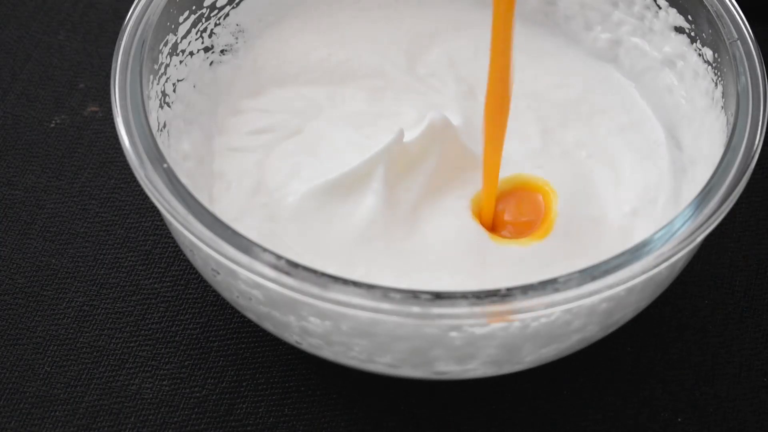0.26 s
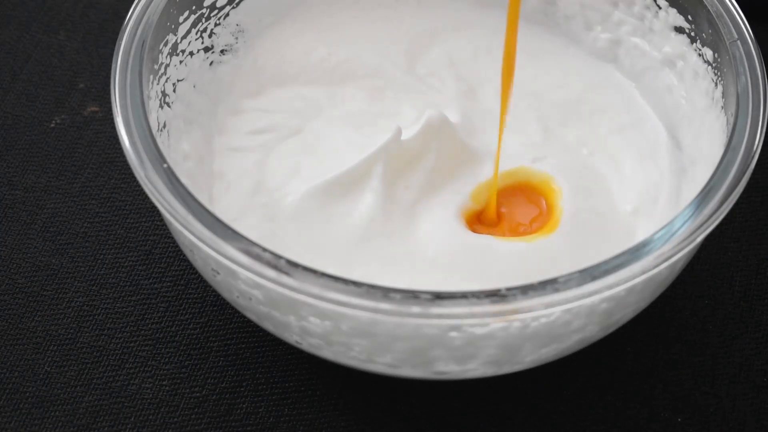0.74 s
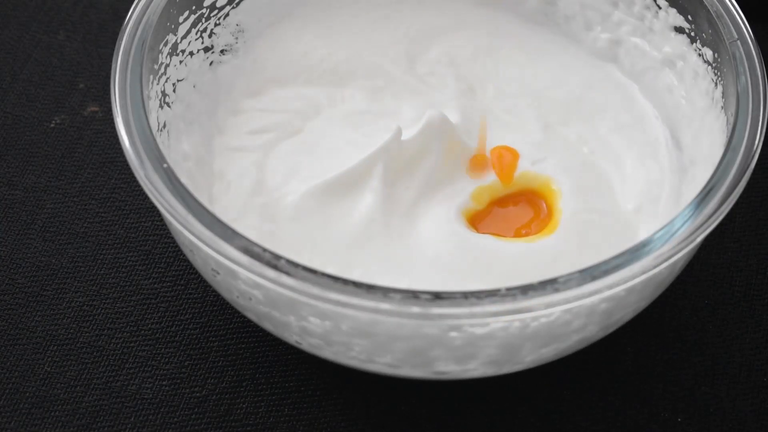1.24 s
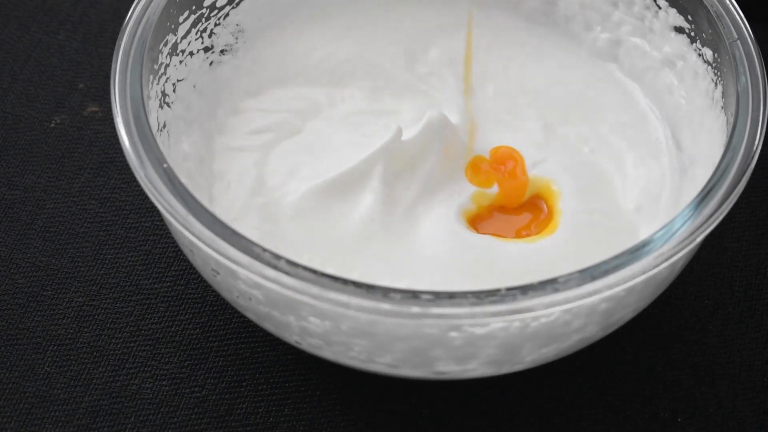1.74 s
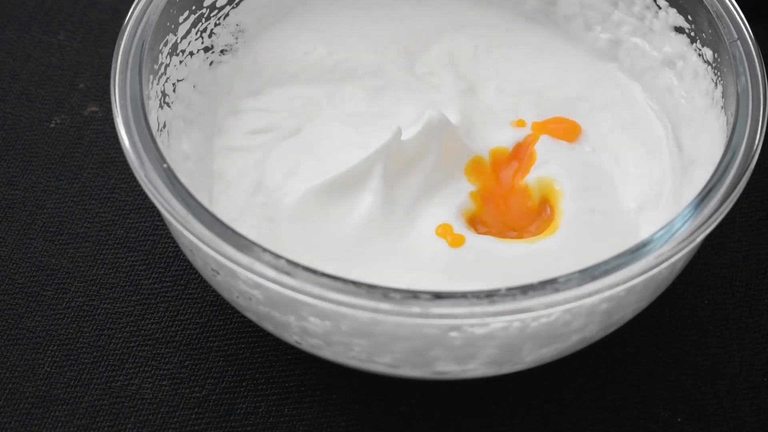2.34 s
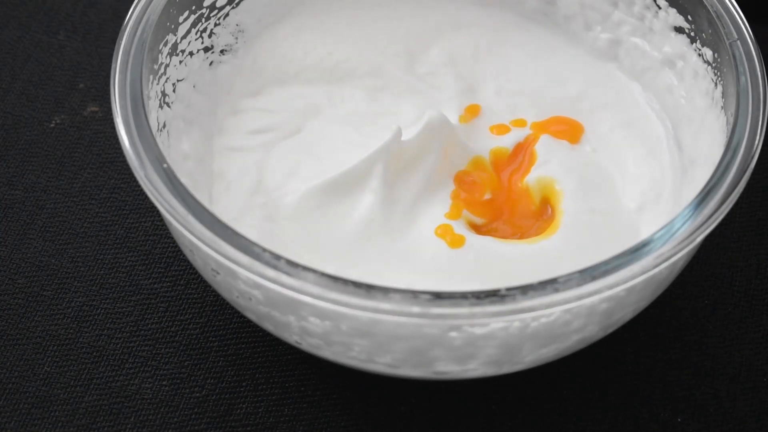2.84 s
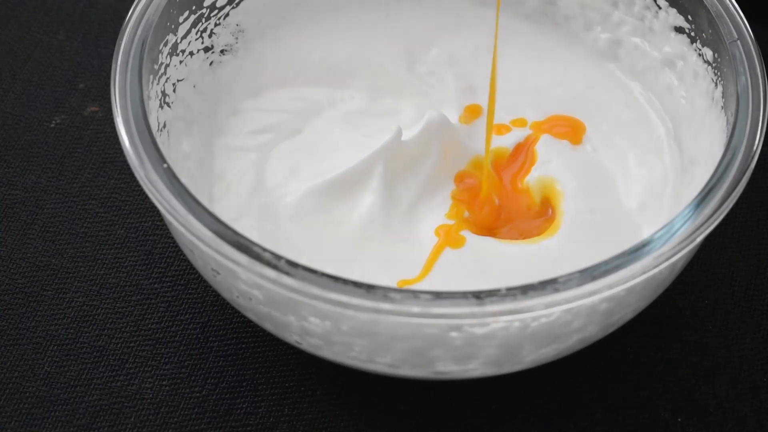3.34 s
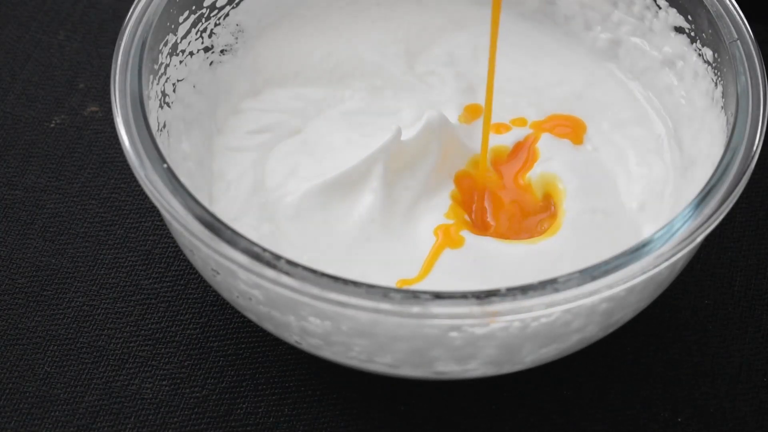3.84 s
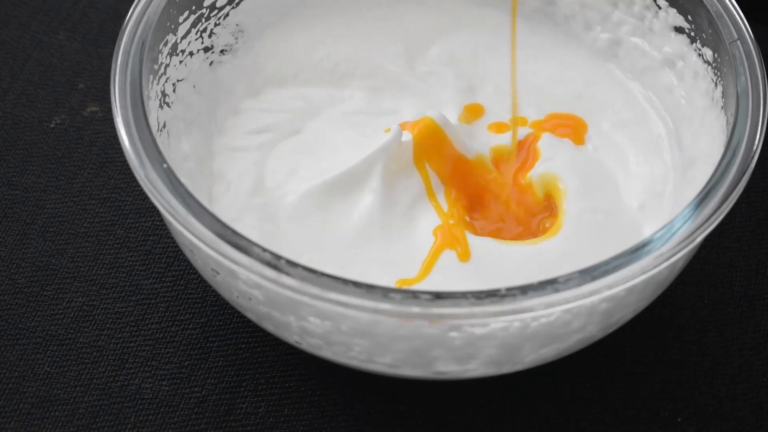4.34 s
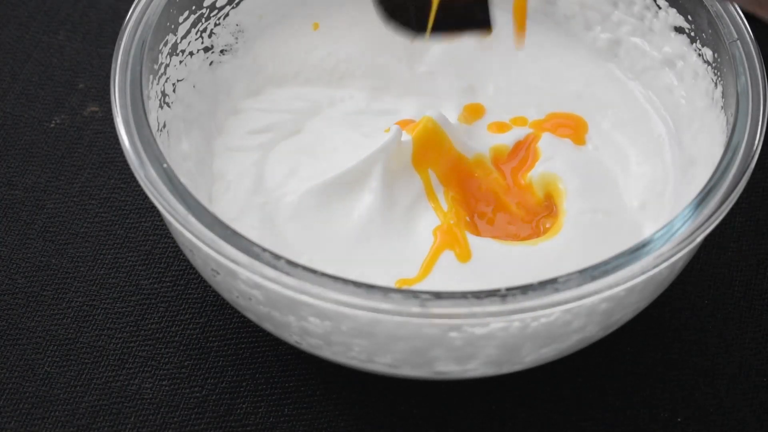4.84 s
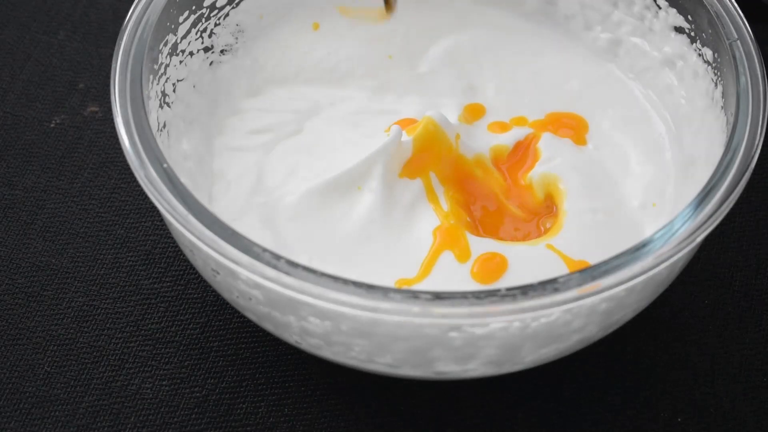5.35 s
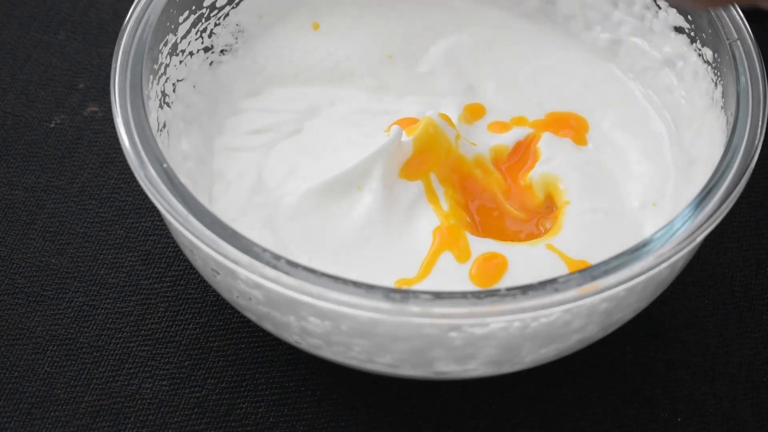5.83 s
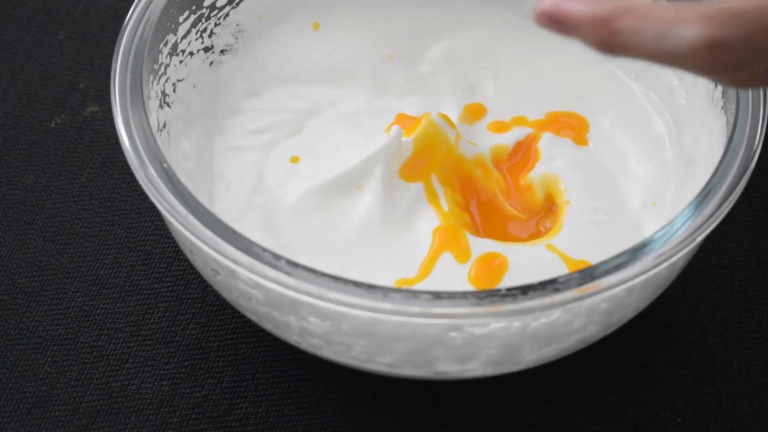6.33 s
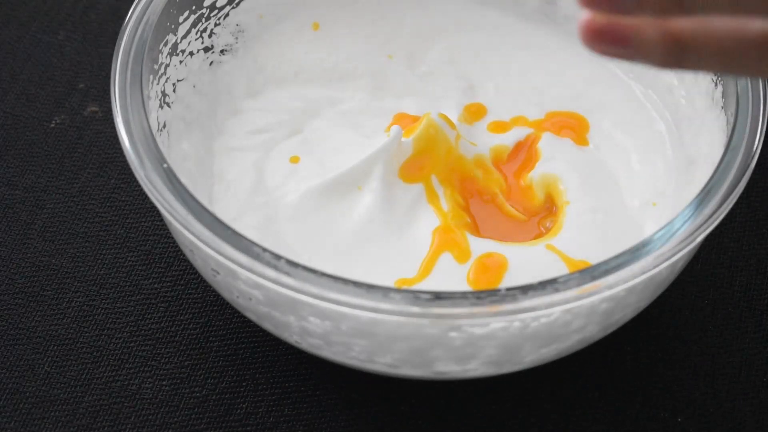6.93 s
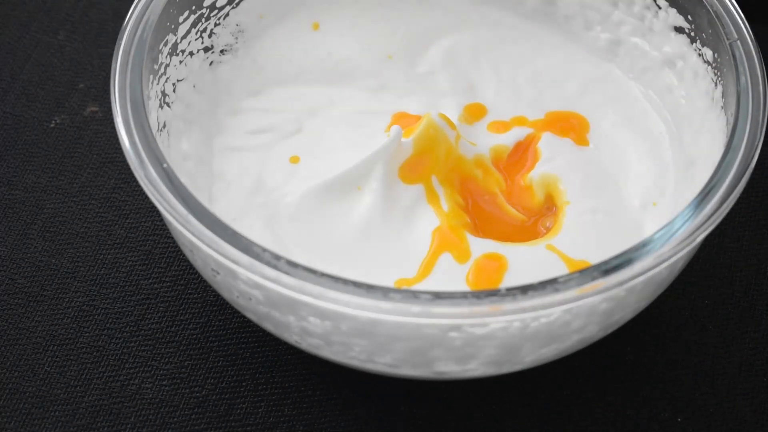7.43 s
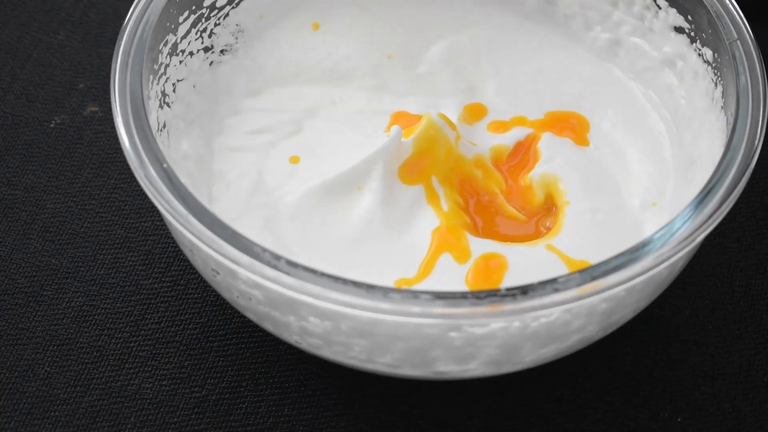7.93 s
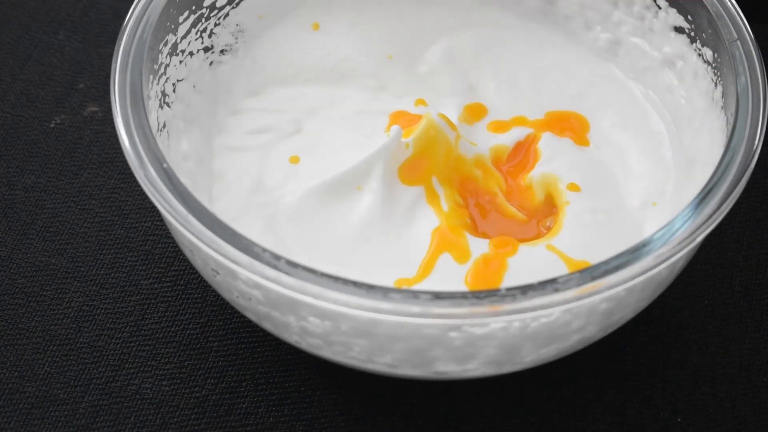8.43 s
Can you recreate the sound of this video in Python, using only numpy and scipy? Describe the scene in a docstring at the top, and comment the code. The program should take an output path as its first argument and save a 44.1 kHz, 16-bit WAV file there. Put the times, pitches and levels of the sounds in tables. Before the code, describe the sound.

A spatula scrapes egg yolk from a small glass dish, heard close up. For the first three seconds there are soft, scattered knocks of the blade and faint wet wiping strokes, while the yolk lands in barely audible low plops. The stem clacks on the rim at about 2.8 and 3.1 seconds, and the handle clicks lightly at 3.7. The dish clinks at 4.2 and 4.5 seconds, then gives one loud, bright, briefly ringing clink at 4.8. A few soft knocks and more quiet wiping follow until about 6 seconds. At 6.3 the spatula is laid on the table with a loud, short knock. Light taps on the glass come between 6.5 and 7.2 seconds, then only the background remains until the end, near 8.5. The small, hard kitchen adds a short echo to each blow, over faint steady hiss, rumble and electrical hum.

```python
"""A spatula scrapes egg yolk from a small glass dish onto whipped egg white, close up.
First the blade wipes and knocks and its stem clacks on the rim; the yolk lands almost silently.
The handle clicks at 3.7 s, then the dish clinks, hardest at 4.8 s. After more wiping the spatula
is laid on the table at 6.3 s; light taps on the glass follow.
Throughout, a small hard kitchen answers each blow over faint hiss, rumble and mains hum."""
import sys
import numpy as np
from scipy import signal
from scipy.fft import rfft, irfft
from scipy.io import wavfile

SR = 44100
rng = np.random.default_rng(int(sys.argv[2]) if len(sys.argv) > 2 else 0)


def master_out(mix):
    """Clip the mix to full scale and print it as 16-bit PCM to the path in sys.argv[1]."""
    frames = np.transpose(np.atleast_2d(mix))
    ceiling = np.clip(frames, -1, 1)
    pcm = np.round(ceiling * 32767).astype(np.int16)
    wavfile.write(sys.argv[1], SR, pcm)


N = 382788
RING_TIME_S = np.arange(SR // 3) / SR

# background spectrum: f/Hz, relative density/dB
FLOOR_SPECTRUM = [(12, -27.5), (20, 5), (30, -3.5), (42, -11.5), (59, -6.5), (85, -14), (120, -13.5),
                  (150, -17.5), (240, -20), (290, -21.5), (700, -27), (1470, -31.5), (2720, -34.5),
                  (15800, -38)]
# background stereo image: f/Hz, left-right correlation
FLOOR_CORRELATION = [(30, 1), (150, 0.99), (1000, 0.9), (4000, 0.62), (8000, 0.45), (13000, 0.39)]
# kitchen decay: f/Hz, t60/s
ROOM_DECAY = [(150, 0.3), (500, 0.29), (1100, 0.39), (3000, 0.38), (5000, 0.39), (9000, 0.35),
              (15000, 0.23)]
# kitchen reflections: f/Hz, level/dB
ROOM_LEVELS = [(150, -5.5), (500, -5.5), (1100, -4.5), (3000, -2), (5000, -3), (9000, -1.5), (15000, -15)]
# plops of yolk and handling: t/s, level/dB
PLOPS = [(0.093, -54), (0.163, -48), (0.6, -51.5), (1.97, -55.5), (2.46, -54), (3.105, -52), (4.282, -53),
         (5.255, -48.5)]
# wiping strokes: t/s, length/s, level/dB
STROKES = [(1.046, 0.47, -68.5), (1.5, .3, -64.5), (1.861, 0.21, -65), (2.46, .33, -63), (2.88, 0.55, -66),
           (5.62, .22, -63), (5.849, 0.18, -63.5), (6.484, 0.086, -56)]
# blade knocks: t/s, level/dB, contact cut-off/Hz
KNOCKS = [(0.0884, -51.5, 3000), (0.5668, -40.5, 12000), (0.6345, -47, 900), (1.8874, -47, 900),
          (2.4548, -42, 1520), (2.587, -55, 2500), (2.6188, -50.5, 1200), (2.774, -55, 3000),
          (3.111, -31.5, 1150), (3.8255, -43.5, 1110), (4.05, -49, 1600), (4.292, -46, 706),
          (4.384, -44, 1090), (4.7601, -45, 1190), (5.1489, -43, 1300), (5.619, -45.5, 1880)]
# stem clacks on the rim: t/s, level/dB
CLACKS = [(1.4868, -47.5), (1.8874, -52), (2.8195, -35.5), (2.916, -45.5), (3.082, -55), (3.1129, -38)]
# modes of blade, stem, handle, tabletop and hand-held dish: f/Hz, level/dB, t60/s
BLADE_MODES = [(394, -1, 0.02), (520, -1.5, .016), (870, 0, 0.015), (1190, -1, .014), (1480, -1, 0.011),
               (1930, -7, 0.01), (2560, -6.5, 0.016), (2954, -5.5, 0.014), (4760, 2.5, 0.0097)]
STEM_MODES = [(420, -7.5, 0.034), (805, -5.5, 0.012), (1260, -4.5, 0.028), (1453, -8.5, 0.035),
              (1920, -3, 0.0087), (2630, 0, 0.01), (3070, -4, 0.019), (3480, -3.5, 0.009), (4700, 3, 0.013),
              (5090, -6, 0.07), (5310, -9, 0.04)]
HANDLE_MODES = [(950, -3, 0.0084), (1880, -1, 0.023), (2020, -8, 0.081), (2260, -3, .014), (3270, 2, 0.015),
                (4700, -7.5, 0.017)]
TABLE_MODES = [(227, -47, 0.025), (478, -3, 0.014), (670, 4.5, 0.014), (993, -8, 0.013), (1053, 6.5, 0.016),
               (1490, -4, 0.012), (1900, -11.5, 0.016), (2360, -14.5, 0.03), (2790, -5, 0.019),
               (3320, -19, 0.049), (3920, -17, 0.014), (4730, -9, 0.0104)]
GLASS_MODES = [(380, -7.5, .012), (660, 0, 0.0077), (900, 0.5, 0.0098), (1105, -15.5, 0.3),
               (1152, -17, 0.42), (1160, 9, 0.013), (1230, -13, 0.087), (1404, -6, .014),
               (1800, -5.5, 0.01207), (2866, 0, 0.025), (2990, -9, 0.036), (3302, -5.5, 0.16),
               (3254, 4.5, 0.022), (3530, 1, 0.028), (3886, -3, .02), (4120, -2, 0.013), (4545, -5, .02),
               (4890, -8.5, 0.11), (4765, 6.5, 0.02), (5020, -4.5, 0.0407), (5170, -8.5, 0.034),
               (5440, -5.5, 0.0248), (6540, -6, .007), (8010, -7.5, .003), (10950, -6.5, 0.0026)]
# glass mode groups (thud, rim tone, ring, chime, tick): low f/Hz, high f/Hz
GROUP_BANDS = [(200, 750), (750, 1900), (2700, 4000), (4000, 5800), (6000, 12500)]
# per group, at even brightness: level/dB
GROUP_LEVELS = [-5.5, 1.5, 0.9, -3, -16]
# per group, contact noise re modes: level/dB
GROUP_CONTACT = [1, -1.5, -4, -3, 1]
# per group, effect of the strike place: sign (ring -1, chime +1)
GROUP_PLACE_SIGNS = [0, 0, -1, 1, 0]
# taps on the dish: t/s, level/dB, brightness/(dB/octave), strike place/dB (+ favours the chime)
TAPS = [(4.147, -50, .5, 1), (4.1598, -34.3, -1.3, 0.5), (4.165, -34, -2, -2), (4.505, -29, .6, 4),
        (4.5105, -30.5, -1.3, -4.5), (4.847, -12, 6.1, 3.5), (6.525, -51.5, -1.5, 0),
        (6.807, -48, -4.5, -6), (6.8272, -50.5, -1, -1), (6.867, -37.8, 1, 1.5), (7.1456, -56.5, -1, -2),
        (7.1682, -50, 2.8, 3)]


def amp(db):
    """Decibels to gain."""
    return 10 ** (np.asarray(db) / 20)


def unit(x):
    """Scale to rms 1."""
    return x / np.sqrt(np.mean(x ** 2) + 1e-20)


def unit_attack(x):
    """Scale to rms 1 over the first 5 ms."""
    return x / np.sqrt(np.mean(x[:SR // 190] ** 2) + 1e-20)


def lookup(points, hz):
    """Interpolate a table over log frequency."""
    table_hz, value = np.transpose(points)
    return np.interp(np.log(hz + 1), np.log(table_hz + 1), value)


def filtered(x, hz, kind, order=2):
    """Causal Butterworth filter."""
    sos = signal.butter(order, np.clip(hz, 1, SR / 2 - 1), kind, fs=SR, output="sos")
    return signal.sosfilt(sos, x)


def add(mix, at_s, sound):
    """Mix a sound in at at_s."""
    part = mix[max(round(at_s * SR), 0):][:len(sound)]
    part += sound[:len(part)]


def background(floor_db=-49, hum_hz=120, hum_db=-65):
    """Room rumble and mains hum in the centre, hiss spread wider."""
    hz = np.fft.rfftfreq(N, 1 / SR)
    mid, side = rfft(rng.standard_normal((2, N))) * amp(lookup(FLOOR_SPECTRUM, hz))
    correlation = lookup(FLOOR_CORRELATION, hz)
    mid, side = mid * np.sqrt(1 + correlation), side * np.sqrt(1 - correlation)
    floor = unit(irfft(np.array([mid + side, mid - side]), N))
    hum = np.sqrt(2) * np.sin(2 * np.pi * hum_hz * np.arange(N) / SR)
    return amp(floor_db) * floor + amp(hum_db) * hum


def kitchen(x, wet_db, build_s=0.0042):
    """Direct sound plus dense reflections that build up, then decay band by band."""
    t = np.arange(SR * 2 // 3) / SR
    hz, frame_s, spectrum = signal.stft(rng.standard_normal(len(t)), SR, nperseg=256)
    t60_s = lookup(ROOM_DECAY, hz)[:, None]
    decay = amp(lookup(ROOM_LEVELS, hz)[:, None] - 60 * frame_s / t60_s)
    energy_norm = np.sqrt(2 * np.log(1000) / (t60_s * SR))
    tail = signal.istft(spectrum * decay * energy_norm, SR, nperseg=256)[1][:len(t)]
    response = amp(wet_db) * tail * (1 - np.exp(-t / build_s))
    response[0] = 1  # direct path
    return signal.fftconvolve(x, response)


def plops(band_hz=(160, 260), length_s=0.082):
    """Yolk and handling: soft, low puffs with no ring."""
    out = np.zeros(N)
    envelope = np.sin(np.pi * np.sqrt(np.minimum(RING_TIME_S / length_s, 1)))
    for at_s, level_db in PLOPS:
        puff = unit(filtered(rng.standard_normal(len(envelope)), band_hz, "band"))
        add(out, at_s, amp(level_db) * puff * envelope)
    return out


def ring(modes, max_cycles=np.inf, pitch=1):
    """Struck modes of alternating sign decay; a grip caps each t60 at max_cycles periods."""
    out = np.zeros(len(RING_TIME_S))
    for k, (hz, level_db, t60_s) in enumerate(modes):
        envelope = amp(level_db - 60 * RING_TIME_S / min(t60_s, max_cycles / hz))
        out += (-1) ** k * envelope * np.sin(2 * np.pi * hz * pitch * RING_TIME_S)
    return out


def contact_noise(t60_s):
    """Brief noise of two surfaces meeting."""
    return rng.standard_normal(len(RING_TIME_S)) * amp(-60 * RING_TIME_S / t60_s)


def blow(modes, low_hz, contact_hz, noise_db, noise_t60_s, detune=0):
    """Modes plus contact noise; a light part radiates no bass, a soft contact no treble."""
    tone = ring(modes, pitch=1 + detune * rng.standard_normal())
    body = unit_attack(tone) + amp(noise_db) * unit_attack(contact_noise(noise_t60_s))
    softened = filtered(body, contact_hz, "low")
    return unit_attack(filtered(softened, low_hz, "high"))


def stroke_gain(rise_share=0.37):
    """Each stroke presses on and lifts off in one smooth arch."""
    gain = np.zeros(N)
    for start_s, length_s, level_db in STROKES:
        progress = np.arange(0, length_s, 1 / SR) / length_s
        arch = np.sin(np.interp(progress, [0, rise_share, 1], [0, np.pi / 2, np.pi]))
        add(gain, start_s, amp(level_db) * arch)
    return gain


def wiping(slips_per_s=1800, flutter_db=1.0):
    """Tiny slips of the wet blade hiss and excite the upper glass modes."""
    sizes = rng.standard_normal(N) * amp(flutter_db * rng.standard_normal(N))
    slips = sizes * (rng.random(N) < slips_per_s / SR)
    damped_glass = ring([(hz, level_db, 0.012) for hz, level_db, _ in GLASS_MODES])
    tone = unit(signal.fftconvolve(slips, damped_glass)[:N])
    hiss = unit(filtered(slips, [1500, 3200], "band"))
    rub = unit(filtered(tone + hiss, [1300, 5200], "band"))
    return kitchen(rub * stroke_gain(), wet_db=1)[:N]


def blade_knock(level_db, contact_hz, ref_db=-46, ref_octaves=3.4, octaves_per_db=0.3):
    """A harder knock moves more of the spatula and reaches further into the bass."""
    low_hz = contact_hz / 2 ** (ref_octaves + octaves_per_db * (level_db - ref_db))
    knock = blow(BLADE_MODES, low_hz, contact_hz, noise_db=0.5, noise_t60_s=0.02, detune=0.03)
    return amp(level_db) * kitchen(knock, wet_db=0)


def blade_catches(rate_per_s=7, above_stroke_db=2.5, spread_db=2.5):
    """The blade catches on the glass: faint knocks at random within each stroke."""
    out = np.zeros(N)
    for start_s, length_s, stroke_db in STROKES:
        for progress, size in rng.random((round(rate_per_s * length_s), 2)):
            level_db = stroke_db + above_stroke_db + spread_db * (2 * size - 1)
            add(out, start_s + progress * length_s, blade_knock(level_db, contact_hz=2700))
    return out


def spatula_blows(click_s=3.6553, click_db=-41, set_down_s=6.3431, set_down_db=-12.5):
    """The blade knocks, the stiff stem clacks, the handle clicks, the spatula meets the table."""
    out = np.zeros(N)
    for at_s, level_db, contact_hz in KNOCKS:
        add(out, at_s, blade_knock(level_db, contact_hz))
    for at_s, level_db in CLACKS:
        clack = blow(STEM_MODES, 210, 5100, noise_db=-1.5, noise_t60_s=0.03, detune=0.011)
        add(out, at_s, amp(level_db) * kitchen(clack, wet_db=2))
    click = blow(HANDLE_MODES, 300, 6000, noise_db=-21, noise_t60_s=0.008)
    add(out, click_s, amp(click_db) * kitchen(click, wet_db=-0.5))
    set_down = blow(TABLE_MODES, 165, 3470, noise_db=-12.5, noise_t60_s=0.01)
    add(out, set_down_s, amp(set_down_db) * kitchen(set_down, wet_db=0.5))
    return out


def glass_group(band_hz, contact_db, force_db, grip_cycles=560, halving_db=20, rattle_db_per_db=0.08):
    """One band of glass modes; a harder blow presses on the glass, damps it and rattles more."""
    low_hz, high_hz = band_hz
    modes = [mode for mode in GLASS_MODES if low_hz <= mode[0] < high_hz]
    tone = unit_attack(ring(modes, max_cycles=grip_cycles / 2 ** (force_db / halving_db)))
    rattle = unit_attack(filtered(contact_noise(t60_s=0.026), band_hz, "band", order=1))
    body = tone + amp(contact_db + rattle_db_per_db * force_db) * rattle
    return unit_attack(filtered(body, band_hz, "band", order=1))


def glass_taps(ref_db=-35, pivot_hz=2470, push_db=-20.5, push_s=0.0007):
    """Each tap shoves the whole dish and rings it; brightness and strike place weight the groups."""
    out = np.zeros(N)
    push_age = RING_TIME_S / push_s
    push = amp(push_db) * unit_attack((1 - push_age) * np.exp(-push_age))
    groups = list(zip(GROUP_BANDS, GROUP_LEVELS, GROUP_CONTACT, GROUP_PLACE_SIGNS))
    for at_s, level_db, tilt_db_per_octave, place_db in TAPS:
        tap = push.copy()
        for band_hz, group_db, contact_db, place_sign in groups:
            octaves = np.log2(np.sqrt(np.prod(band_hz)) / pivot_hz)
            gain = amp(group_db + tilt_db_per_octave * octaves + place_sign * place_db)
            tap += gain * glass_group(band_hz, contact_db, force_db=level_db - ref_db)
        add(out, at_s, amp(level_db) * kitchen(tap, wet_db=1))
    return out


def scene():
    """Stereo background; all handling sounds centred."""
    return background() + glass_taps() + spatula_blows() + wiping() + blade_catches() + plops()


def record(dry, limit_db=-3, release_db_per_s=130, attack_s=0.0014, edge_hz=16000):
    """A limiter ducks after the hardest clink, whose first cycles clip; then a low-pass."""
    peak_db = 20 * np.log10(abs(dry).max(0) + 1e-9)
    release_db = np.arange(N) / SR * release_db_per_s
    held_db = np.maximum.accumulate(peak_db + release_db) - release_db
    over_db = np.maximum(held_db - limit_db, 0)
    pole = np.exp(-1 / (attack_s * SR))
    duck_db = signal.lfilter([1 - pole], [1, -pole], over_db)
    clipped = np.clip(dry / amp(duck_db), -1, 1)
    low_pass = signal.firwin(511, edge_hz, window=("kaiser", 9), fs=SR)
    return signal.oaconvolve(clipped, low_pass[None], "same")


dry = scene()
out = record(dry)
master_out(out)
```